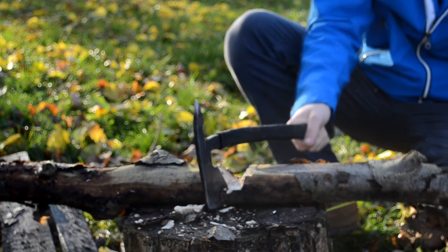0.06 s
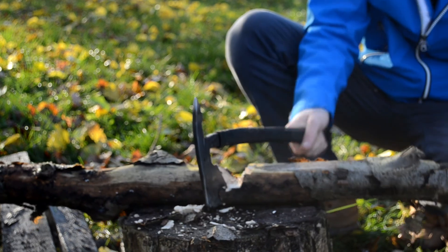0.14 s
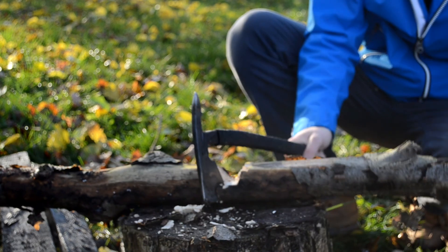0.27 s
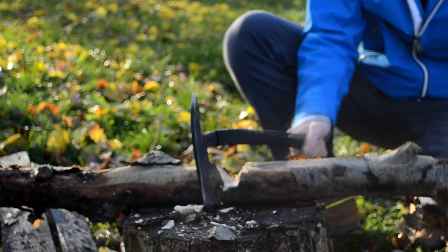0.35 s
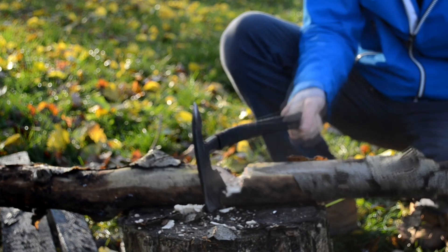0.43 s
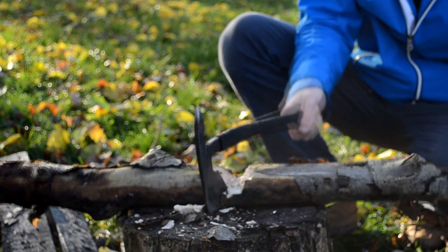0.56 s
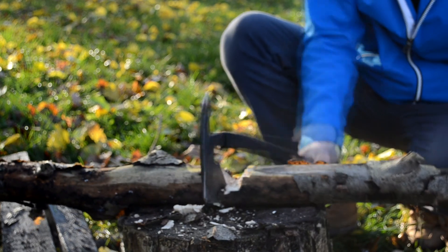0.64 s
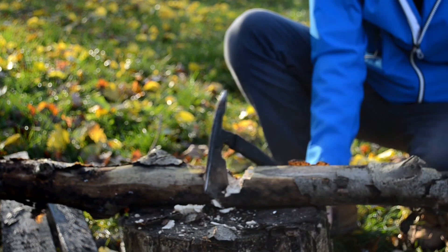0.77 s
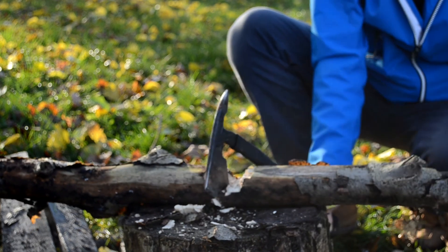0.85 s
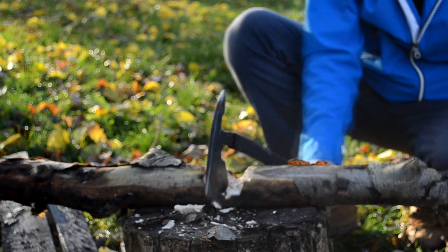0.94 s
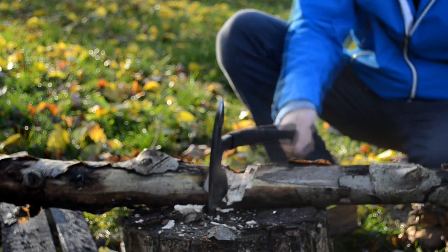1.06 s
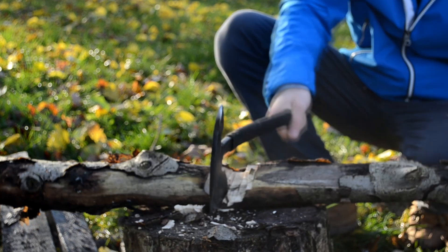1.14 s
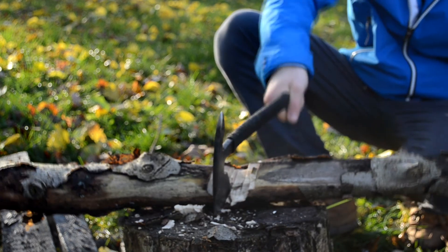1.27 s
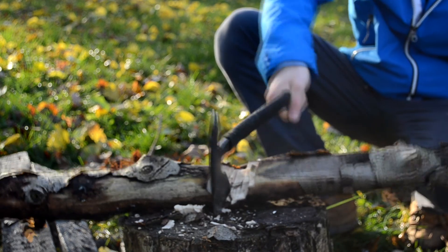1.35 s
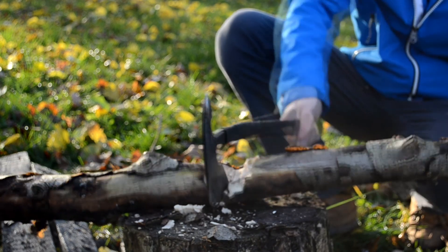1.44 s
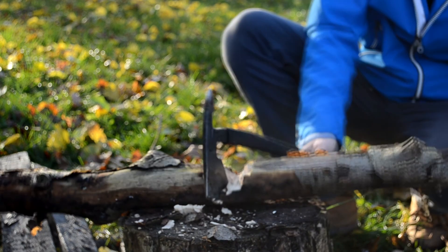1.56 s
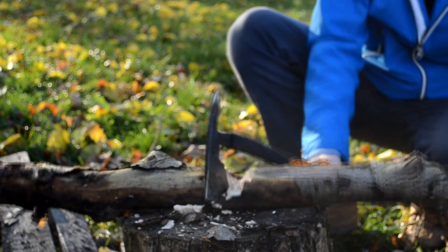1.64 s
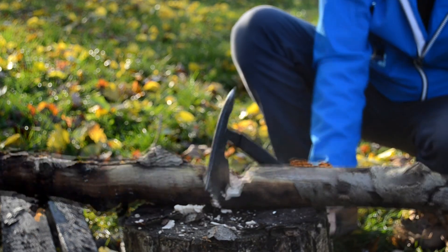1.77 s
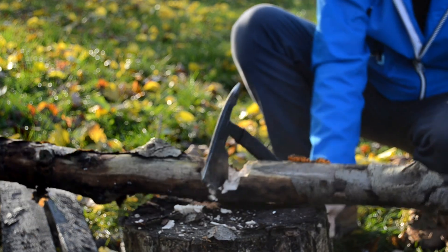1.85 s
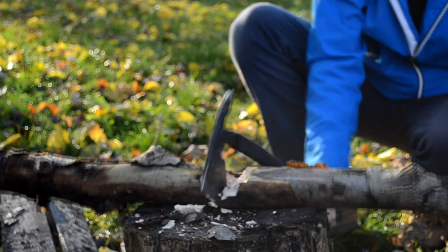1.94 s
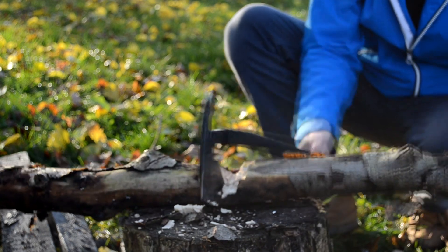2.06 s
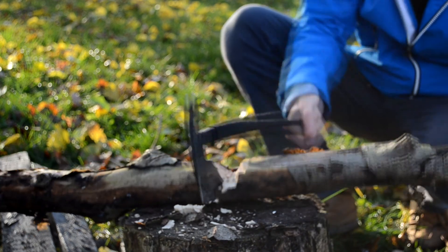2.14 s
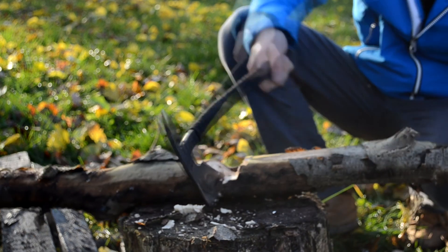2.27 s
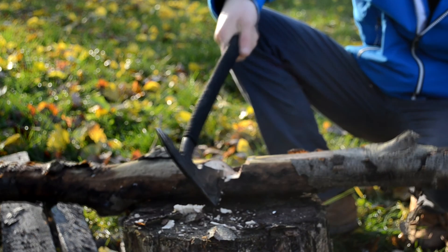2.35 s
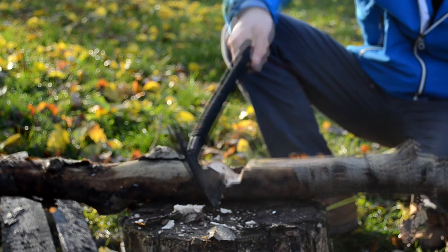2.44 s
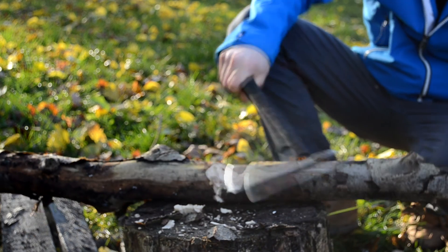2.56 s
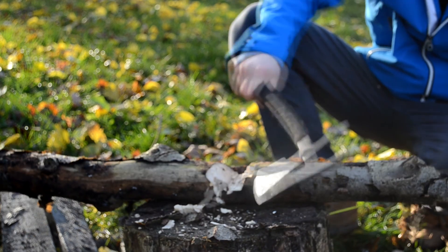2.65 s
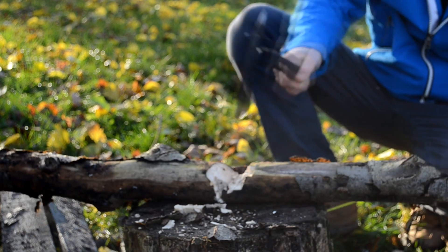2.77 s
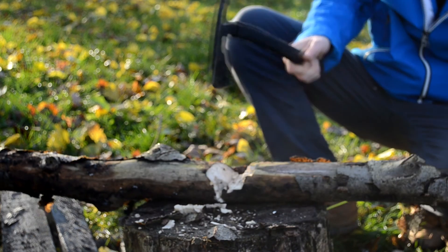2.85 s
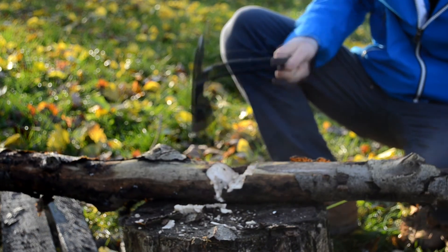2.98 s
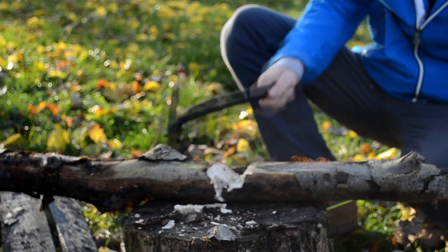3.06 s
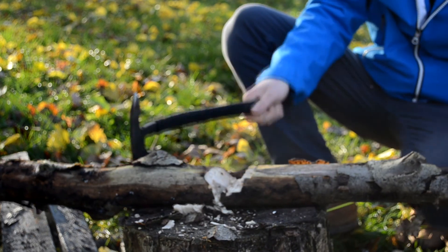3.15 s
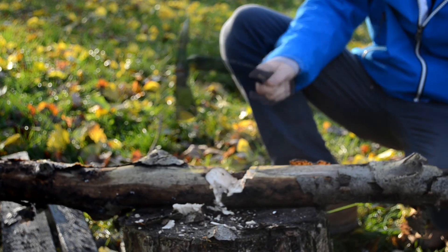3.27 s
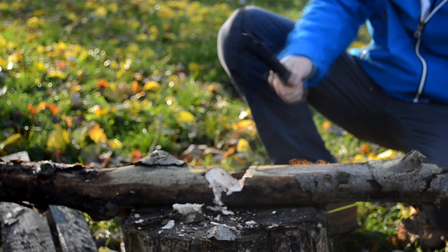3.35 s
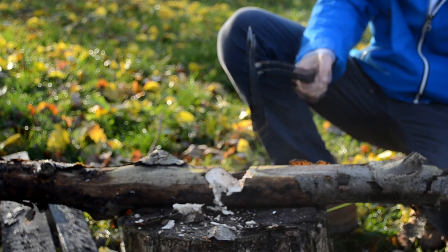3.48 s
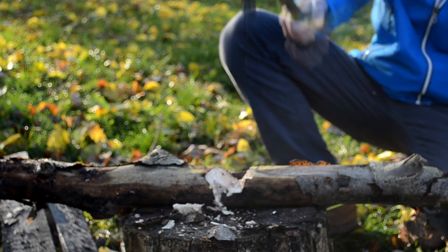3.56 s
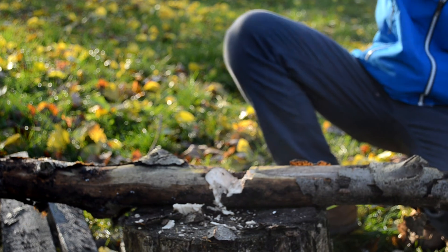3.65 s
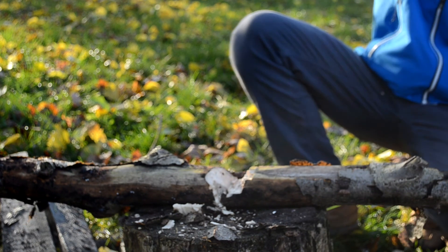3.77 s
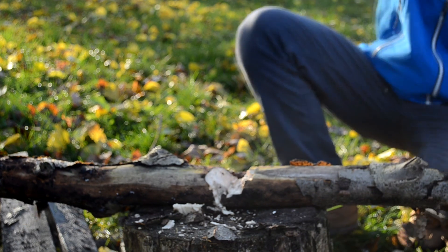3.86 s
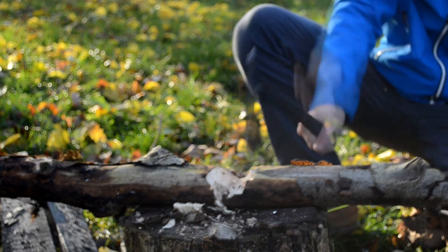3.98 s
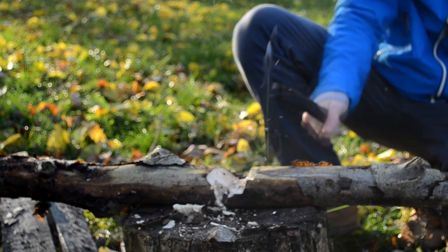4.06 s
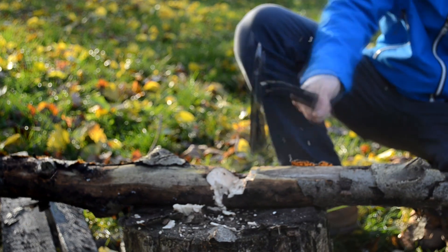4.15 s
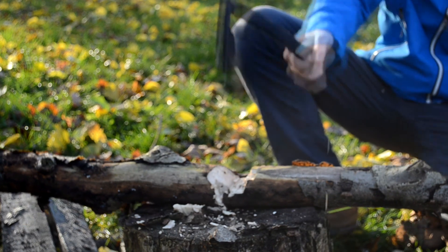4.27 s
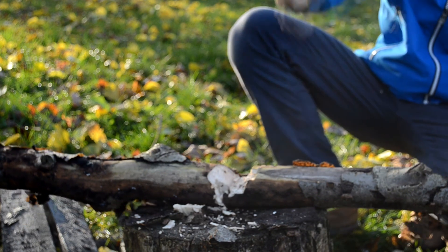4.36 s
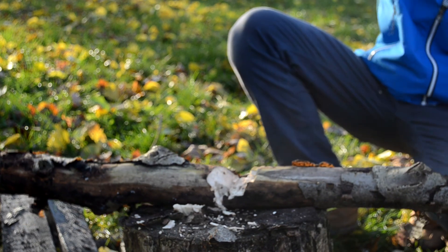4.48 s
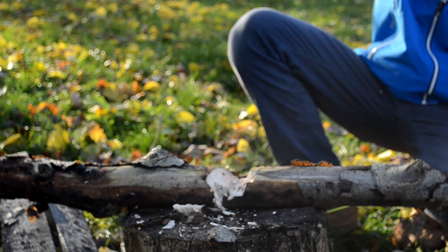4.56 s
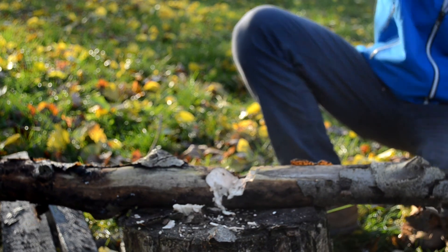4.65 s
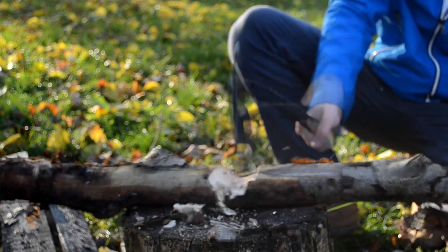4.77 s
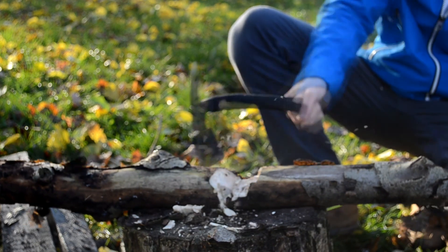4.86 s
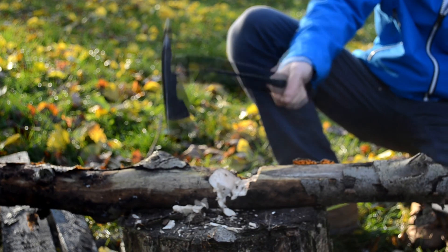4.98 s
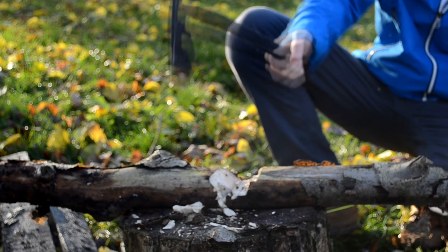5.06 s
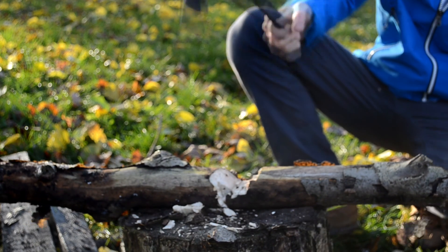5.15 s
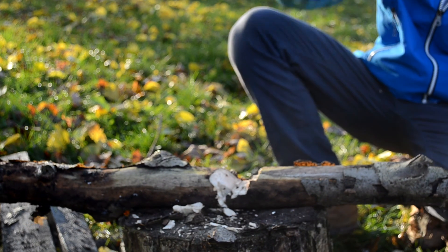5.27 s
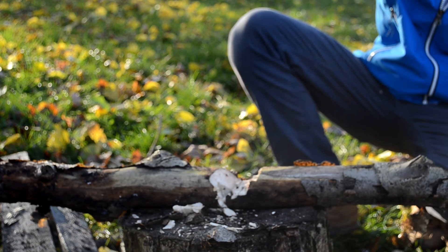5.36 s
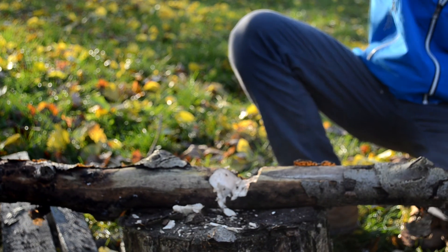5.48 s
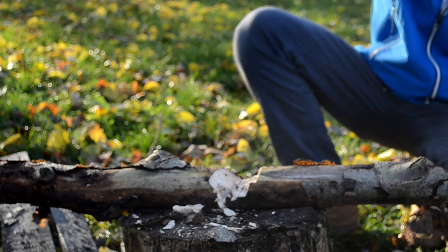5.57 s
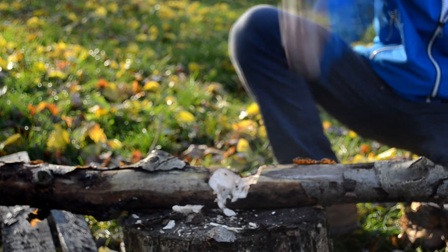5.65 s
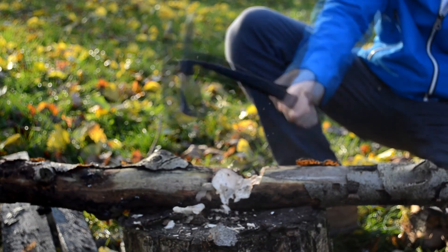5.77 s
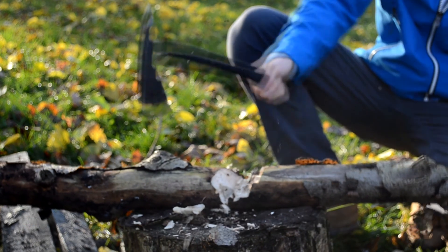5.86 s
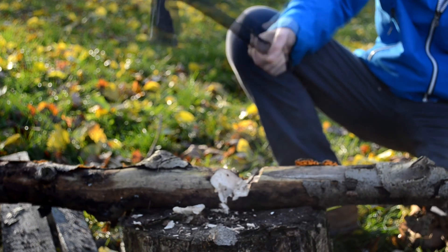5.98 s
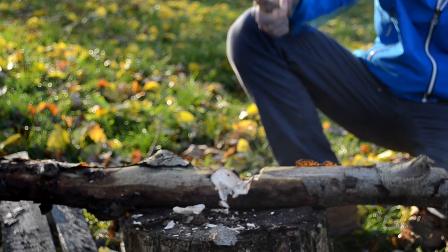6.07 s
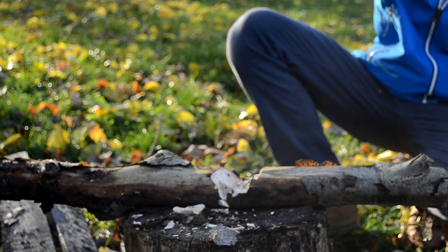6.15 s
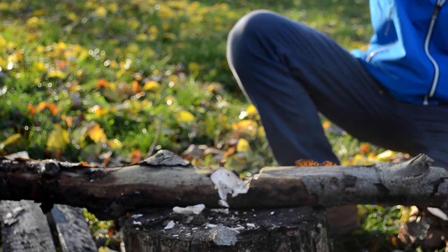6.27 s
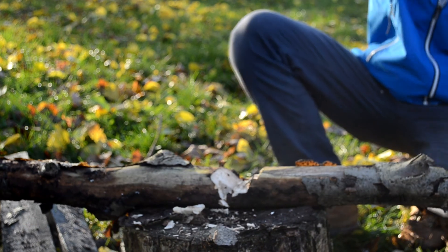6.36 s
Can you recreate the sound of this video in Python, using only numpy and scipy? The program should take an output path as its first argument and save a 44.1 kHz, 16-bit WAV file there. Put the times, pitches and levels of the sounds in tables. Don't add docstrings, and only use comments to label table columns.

```python
import sys
import numpy as np
from scipy import signal
from scipy.io import wavfile
from scipy.ndimage import uniform_filter1d

SR = 44100
rng = np.random.default_rng(int(sys.argv[2]) if len(sys.argv) > 2 else 0)


def to_linear_factor(level_db):
    exponent = np.asarray(level_db, float) / 20
    return 10 ** exponent


def transcribe(signal):
    frames = np.atleast_2d(signal).T
    limited = np.clip(frames, -1, 1)
    pcm = np.round(limited * 32767).astype(np.int16)
    wavfile.write(sys.argv[1], SR, pcm)


N = 283122
RUMBLE_CUT = signal.butter(2, 110, "highpass", fs=SR)


def evened(x):
    return x / np.sqrt(np.mean(abs(x) ** 2) + 1e-20)


def read(points, hz):
    f, value = np.transpose(points)
    return np.interp(np.log(hz + 1), np.log(f + 1), value)


def add(mix, s, sound):
    part = mix[round(s * SR):][:len(sound)]
    part += sound[:len(part)]


def ring(modes, seconds=.4, rise=0.2):
    t = np.arange(round(seconds * SR)) / SR
    total = np.zeros(len(t))
    for hz, db, t60 in modes:
        fading = to_linear_factor(db - 60 * t / t60)
        swelling = (1 - np.exp(-t * hz / rise)) ** 2
        total += fading * swelling * np.sin(2 * np.pi * hz * t)
    return total


def bite(shudder_db, t60):
    t = np.arange(1500) / SR
    jolts = rng.standard_normal(len(t)) * (rng.random(len(t)) < .06)
    force = to_linear_factor(shudder_db - 60 * t / t60) * jolts
    force[0] = 1
    return force


def glide(rows, rough, size):
    s, hz, db = np.transpose(rows)
    t = np.arange(N) / SR
    waver = 1 + rough * evened(uniform_filter1d(rng.standard_normal(N), size=size))
    level = to_linear_factor(np.interp(t, s, db, -120, -120))
    phase = 2 * np.pi * np.cumsum(np.interp(t, s, hz)) / SR
    return level * waver * np.sin(phase)


def noise(spectrum, patchy_db, flicker_db):
    edge_hz = 15760
    frames, hz = N // 128 + 5, np.fft.rfftfreq(512, 1 / SR)
    a, b, patches = rng.standard_normal((frames, 257, 3)).T
    patches = uniform_filter1d(patches, size=4, axis=0)
    patches = evened(uniform_filter1d(patches, size=16, axis=1))
    flicker = evened(uniform_filter1d(rng.standard_normal(frames), size=4))
    level_db = read(spectrum, hz)[:, None] + patchy_db * patches + flicker_db * flicker
    z = (a + 1j * b) * (hz < edge_hz)[:, None] * to_linear_factor(level_db)
    return evened(signal.istft(z, nperseg=512, noverlap=384)[1][:N])


BLOW_TIMES = [.0213, .6058, 3.9724, 4.7541, 4.7584, 5.6817]
# (blow level/dB, ground bounce level/dB, splinter crack level/dB, yard level/dB)
BLOWS = [
    (-18.5, -2, -39, -29),
    (-18.5, 15.5, -25, -28),
    (1, -9, -11, -32),
    (-24.5, -37, -8, -39),
    (0.5, -19.5, -3.5, -26.5),
    (0.5, -2.5, -8.5, -34.5),
]
CEILINGS = [0, 0, -5.5, 0, -3, -7]
# (f/Hz, level/dB, t60/s)
DULL_WOOD = [(700, 0, .014), (1150, -12, .015), (450, -10, .04), (660, -14, .06), (900, -16, .04),
             (285, -14, .05), (150, -16, .06)]
LOOSE_WOOD = [(880, 3, 0.0085), (481, -13, 0.043), (1363, -14.5, 0.038), (1870, -29, 0.049),
              (2800, -31, 0.0072), (690, -18.5, 0.054), (1130, -7.5, 0.013), (175, -35.5, 0.23),
              (196, -48, 0.1), (332, -45, 0.12)]
FIRM_WOOD = [(2500, 0, .006), (1630, -8, .017), (1050, -9, .02), (2050, -12, .015), (4300, -4, .005),
             (780, -10, .022), (640, -14, .045), (440, -31, .08), (95, -28, .12), (2950, -14, .012),
             (2450, -50, .5), (3600, -14, .005)]
HARD_WOOD = [(1600, 0, .017), (2630, -5, .008), (1350, -8, .022), (2100, -6, .012), (1000, -14, .015),
             (740, -14, .03), (440, -28, .08), (100, -26, .1), (3400, -10, .006), (170, -26, .08),
             (560, -22, .03), (5950, -12, .004), (4300, -14, .004)]
DEEP_WOOD = [(780, 5, .0055), (2500, 7, .003), (4200, -1, .0025), (3400, -6, .003), (920, -19, .035),
             (500, -17, .05), (2050, -20, .025), (1500, -16, .02), (100, -30, .12), (2500, -26, .02),
             (620, -24, .03), (1150, -22, .02)]


def chops():
    bounce_s = .0044
    out = np.zeros(N)
    splinters = signal.butter(2, [2500, 11000], "bandpass", fs=SR)
    woods = [DULL_WOOD, LOOSE_WOOD, FIRM_WOOD, HARD_WOOD, HARD_WOOD, DEEP_WOOD]
    for s, row, ceiling_db, modes in zip(BLOW_TIMES, BLOWS, CEILINGS, woods):
        db, bounce_db, crack_db, yard_db = row
        body = signal.lfilter(*RUMBLE_CUT, ring(modes))
        wood = signal.fftconvolve(body, bite(-25, .04))
        t = np.arange(len(wood)) / SR
        tearing = to_linear_factor(-60 * t / 0.005) + to_linear_factor(-42.5 - 60 * t / .04)
        fibres = signal.lfilter(*splinters, rng.standard_normal(len(t))) * tearing
        blow = to_linear_factor(db) * (wood + to_linear_factor(crack_db + 0.5) * fibres)

        heard = blow.copy()
        add(heard, bounce_s, to_linear_factor(bounce_db) * blow)
        ceiling = to_linear_factor(ceiling_db)
        add(out, s, np.clip(heard, -ceiling, ceiling))

        start = blow[:200] * np.hanning(400)[200:]
        add(out, s, to_linear_factor(yard_db + 3) * signal.fftconvolve(start, yard()))
    return out


# (f/Hz, t60/s)
YARD_FADE = [(100, 0.17), (400, 0.37), (1500, .7), (3000, 0.48), (6000, .3)]
# (f/Hz, level/dB)
YARD_COLOUR = [(100, -2), (400, -4), (1500, -3), (3000, -4), (5000, -10), (12000, -13.5)]


def yard(first_s=0.017, swell_s=0.023):
    taps = np.zeros(SR)
    slots = np.arange(0, SR - 20, 20)
    at = slots + rng.integers(0, 20, len(slots))
    taps[at] = rng.choice([-1., 1.], len(slots)) * rng.uniform(.3, 1.7, len(slots))
    hz, t, z = signal.stft(taps, SR, nperseg=256)
    level_db = read(YARD_COLOUR, hz)[:, None] - 60 * t / read(YARD_FADE, hz)[:, None]
    tail = signal.istft(z * to_linear_factor(level_db), SR, nperseg=256)[1]
    swell = (np.arange(len(tail)) / SR - first_s) / swell_s
    tail *= np.clip(swell, 0, 1) ** 1.8
    return tail / np.linalg.norm(tail)


# (t/s, peak level/dB, f/Hz)
BUMPS = [(0.031, -29.5, 640), (0.622, -22, 523), (0.636, -29, 820), (0.666, -38.5, 560), (1.03, -47, 1370),
         (2.473, -30.5, 424), (2.481, -32.5, 1800), (2.581, -34, 294), (3.812, -42.5, 900),
         (3.718, -39.5, 614), (3.933, -35.5, 510), (4.015, -38, 700), (4.049, -30.5, 1030),
         (4.083, -29, 455), (4.469, -45.5, 510), (4.706, -36.5, 1000), (4.714, -32.5, 634),
         (4.822, -35, 218), (4.835, -29.5, 1440), (5.612, -37.5, 750), (5.63, -34.5, 960),
         (5.648, -34, 800), (5.7, -24, 560), (5.72, -41.5, 2500), (5.744, -41, 2700), (5.755, -35, 1100),
         (5.758, -39, 2570)]
# (t/s, peak level/dB, f/Hz)
THUDS = [(0.69, -44, 1800), (0.847, -45, 328), (0.968, -46, 950), (1.925, -43.5, 108), (3.073, -38, 184),
         (5.383, -46.5, 468), (5.859, -44, 1080), (5.978, -53, 597), (6.129, -50, 175), (6.197, -44.5, 674),
         (6.249, -46, 530), (6.312, -49, 534), (6.404, -54.5, 558)]


def bumps():
    out = np.zeros(N)
    for rows, t60 in [(BUMPS, 0.033), (THUDS, 0.063)]:
        for s, db, hz in rows:
            modes = [(hz, 0, .4 * t60), (1.6 * hz, -4, .3 * t60), (.6 * hz, -5, .4 * t60),
                     (900, -12, .006), (1800, -16, .004)]
            knock = np.convolve(bite(-12.5, 0.07), ring(modes, .15))
            add(out, s, to_linear_factor(db + 1) * knock / abs(knock).max())
    return out


# (f/Hz, level/dB, t60/s)
STEEL = [(1830, 0, .025), (3700, -7, .007), (2800, -8, .006), (6300, -16, .004), (9800, -18, .004)]
# (t/s, level/dB)
CLINKS = [
    (2.4474, -49),
    (2.4543, -27),
    (2.4607, -26),
]


def clinks():
    out = np.zeros(N)
    for s, db in CLINKS:
        add(out, s, to_linear_factor(db) * np.convolve(bite(-20, .03), ring(STEEL, .1, rise=.06)))
    return out


# (t/s, f/Hz, level/dB)
SQUEAK = [(2.513, 7100, -60), (2.516, 7200, -50), (2.5195, 7600, -50), (2.522, 11500, -57),
          (2.524, 13000, -70)]


def squeak():
    return glide(SQUEAK, rough=.7, size=40)


# (t/s, f/Hz, level/dB)
WHIRR = [(4.79, 480, -58), (4.83, 453, -48), (4.9, 395.4, -53.5), (4.969, 332, -63.5), (5.05, 308, -89)]


def whirr():
    return glide(WHIRR, rough=.8, size=150)


# (t/s, f/Hz, level/dB)
CREAK = [(.872, 640, -60), (.885, 646, -55), (.93, 658, -55), (.95, 654, -73)]


def creak():
    return glide(CREAK, rough=0.66, size=200)


# (t/s, peak level/dB, f/Hz)
TICKS = [(0.612, -36, 5140), (1.207, -67, 10300), (1.637, -57, 10300), (1.9794, -62, 10600),
         (2.291, -62, 7570), (2.3022, -55, 7200), (2.358, -63, 6940), (2.582, -60, 8210), (3.08, -49, 5940),
         (4.117, -56, 7540), (4.1849, -61, 7520), (4.2158, -48.5, 7450), (4.252, -59, 5900),
         (4.297, -58, 6200), (4.4318, -59, 6640), (4.95, -49, 10500), (5.064, -56.5, 7900),
         (5.108, -56.5, 7910), (5.119, -60, 9350), (5.1865, -52, 10800), (5.4994, -52.5, 9900),
         (5.6903, -36, 6470), (5.698, -51, 4500), (5.7055, -52, 6350), (5.871, -52, 7550),
         (5.872, -54, 13000), (5.987, -50, 6270), (6.0724, -61, 10100), (6.32, -60.5, 6000)]
# (t/s, peak level/dB, f/Hz)
CHIPS = [(0.6134, -22, 2490), (1.6362, -47.5, 2880), (2.586, -45, 1300), (3.424, -46.5, 2580),
         (3.6885, -40, 1450), (3.689, -55, 4400), (4.279, -45, 1890), (4.281, -42, 940),
         (5.4455, -45, 1280), (5.649, -37.5, 1190), (4.2165, -39, 2920), (4.5047, -52.5, 2580),
         (4.948, -46, 4200), (5.3406, -54, 3200), (5.562, -54, 2780), (5.944, -49.5, 2880),
         (6.075, -58, 4260), (6.103, -54.5, 3050), (6.263, -58, 2850)]


def ticks():
    out, t = np.zeros(N), np.arange(800) / SR
    for rows, fade_s in [(TICKS, .002), (CHIPS, .0025)]:
        for s, db, hz in rows:
            band = signal.butter(2, [hz / 1.22, min(hz * 1.22, .45 * SR)], "bandpass", fs=SR)
            crackle = signal.lfilter(*band, rng.standard_normal(800) * np.exp(-t / fade_s))
            add(out, s, to_linear_factor(db + 3) * crackle / abs(crackle).max())
    return out


# (peak t/s, swish level/dB, hiss over swish level/dB, length t/s)
RUBS = [(.04, -67.5, -2.5, .15), (0.252, -55, -20, 0.13), (0.43, -64, -7, 0.18), (1.035, -55.5, -9, 0.19),
        (1.226, -62.5, -17, 0.11), (1.493, -61.5, -9, .14), (1.732, -58.5, -11, 0.31),
        (1.974, -61, -15, 0.11), (2.153, -57, -7.5, 0.28), (2.207, -55, -8, 0.12), (2.58, -61, -11, 0.6),
        (2.774, -62, -7, 0.24), (2.9, -59.5, -6.5, 0.21), (3.088, -50, -7, .14), (3.29, -56, -10, 0.28),
        (3.685, -53, -31, 0.11), (4.244, -59, -6.5, 0.21), (4.34, -67, 0.5, .1), (4.438, -58.5, -2, 0.036),
        (4.518, -64, -5, .12), (4.96, -56.5, -7, .3), (5.07, -55, -14, 0.13), (5.193, -62.5, -5, 0.068),
        (5.442, -58, -9, 0.06), (5.819, -54.5, -20, .15), (5.967, -55, -12.5, 0.33), (6.12, -66, -3, .15),
        (6.314, -58, -13, 0.15), (6.42, -49.5, -30, 0.042)]
# (t/s, downswing level/dB, recoil level/dB, recoil hiss over swish level/dB)
SWINGS = [
    (.61, -71, -50, -13),
    (3.97, -54, -44.5, -25.5),
    (4.757, -56.5, -43, -22.5),
    (5.68, -55, -42, -22),
]
# (f/Hz, level/dB per Hz)
HISS = [(1500, -29), (2500, 13), (4500, 2.5), (7500, -2.5), (11500, -2.5), (14000, -11.5), (16500, -26)]
# (f/Hz, level/dB per Hz)
SWISH = [(100, -42.5), (250, -14.5), (450, 1), (1000, 2), (2000, -4.5), (4000, -22.5), (8000, -48.5)]


def jacket():
    rub_fall_db = 27.5
    downswing_db_per_s, downswing_hiss_db = 39.5, -11.5
    recoil_lag_s, recoil_db_per_s = 0.029, 90.5
    t = np.arange(0, N, 32) / SR
    moves = []  # (swish level in dB over time, hiss over swish in dB)
    for s, db, hiss_db, length in RUBS:
        moves.append((db - rub_fall_db * abs(t - s) / length, hiss_db))
    for s, down_db, recoil_db, hiss_db in SWINGS:
        downswing = np.where(t < s, down_db - downswing_db_per_s * (s - t), -200)
        moves.append((downswing, downswing_hiss_db))
        after = t - s - recoil_lag_s
        recoil = recoil_db - np.where(after > 0, recoil_db_per_s * after, -600 * after)
        moves.append((recoil, hiss_db))

    swish = np.sqrt(sum(to_linear_factor(2 * db) for db, _ in moves))
    hiss = np.sqrt(sum(to_linear_factor(2 * (db + hiss_db)) for db, hiss_db in moves))
    swish, hiss = (np.repeat(level, 32)[:N] for level in (swish, hiss))
    bright = hiss * noise(HISS, patchy_db=1.2, flicker_db=1.5)
    return bright + swish * noise(SWISH, patchy_db=1.8, flicker_db=2.2)


# (f/Hz, level/dB per Hz)
TRAFFIC = [(18, -35), (30, -1.5), (167, -14), (500, -11), (700, -7.5), (1800, -14.5), (6720, -36.5),
           (15000, -42)]
# (f/Hz, width f/Hz, level/dB)
DRONES = [(647, 25, -72.5), (970, 60, -73.5), (1800, 80, -74), (4300, 100, -83)]


def traffic():
    out = to_linear_factor(-61.5) * noise(TRAFFIC, patchy_db=2.0, flicker_db=1.25)
    for hz, width, db in DRONES:
        narrow = signal.iirpeak(hz, hz / width, SR)
        out += to_linear_factor(db) * evened(signal.lfilter(*narrow, rng.standard_normal(N)))
    return out


def scene():
    near = chops() + ticks() + signal.lfilter(*RUMBLE_CUT, bumps() + clinks())
    sliding = squeak() + whirr() + creak()
    far = jacket() + traffic()
    return (near + sliding + far)[None]


def band_limit(x):
    return signal.sosfilt(signal.butter(12, 17130, fs=SR, output="sos"), x)


def record(dry):
    whine_hz, whine_db, offset = 15688, -84, .0006
    t = np.arange(N) / SR
    whine = np.sqrt(2) * to_linear_factor(whine_db) * np.sin(2 * np.pi * whine_hz * t)
    limited = signal.oaconvolve(dry, signal.firwin(101, 16500, fs=SR)[None], "same")
    return band_limit(limited + whine + offset)


dry = scene()
out = record(dry)
transcribe(out)
```